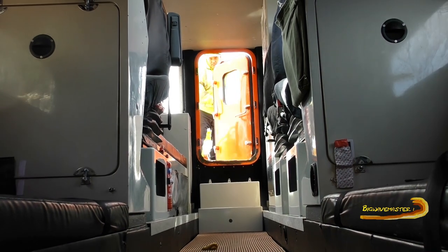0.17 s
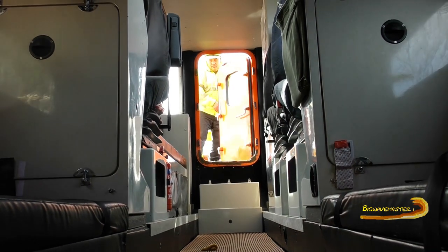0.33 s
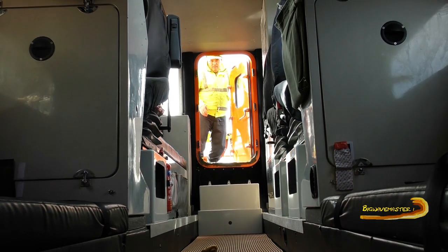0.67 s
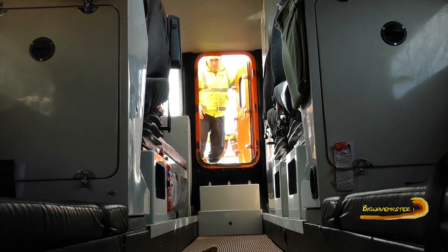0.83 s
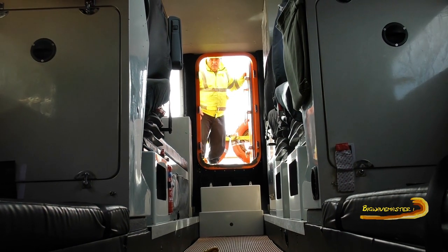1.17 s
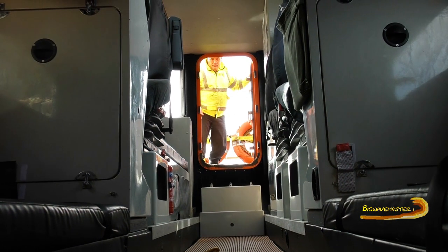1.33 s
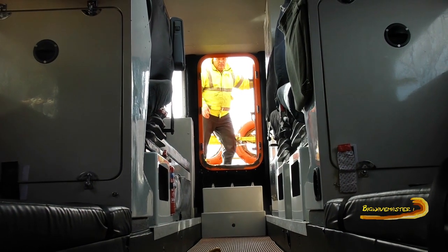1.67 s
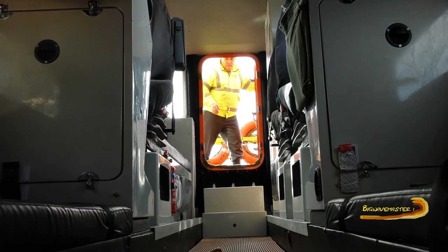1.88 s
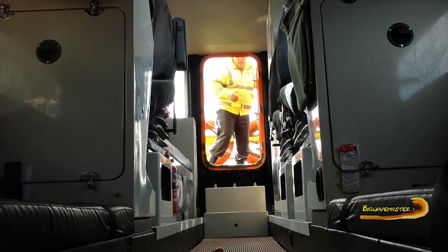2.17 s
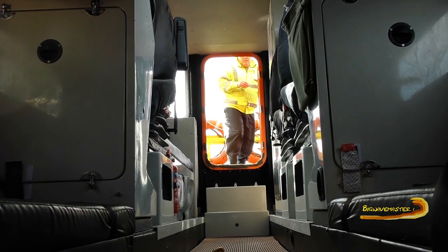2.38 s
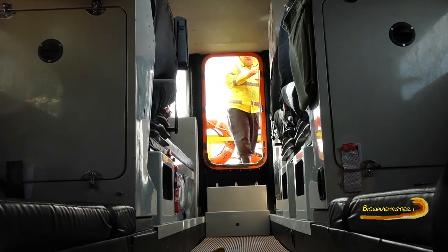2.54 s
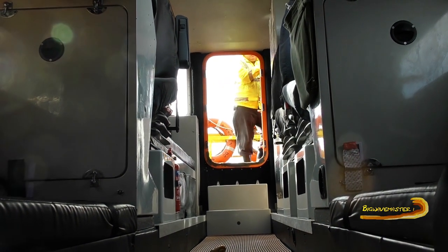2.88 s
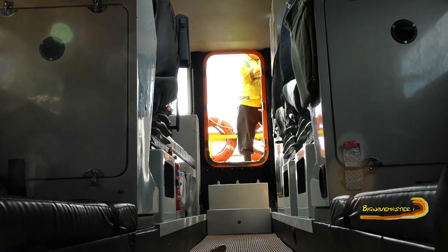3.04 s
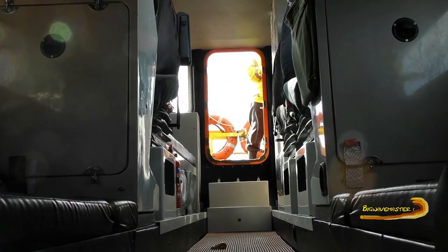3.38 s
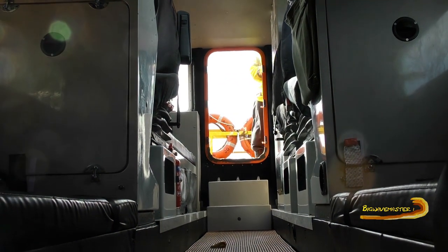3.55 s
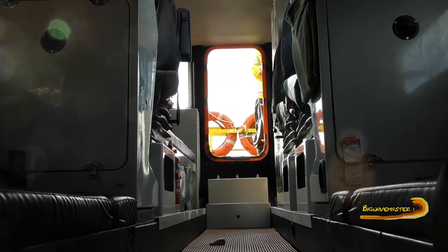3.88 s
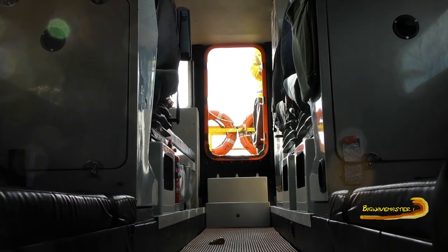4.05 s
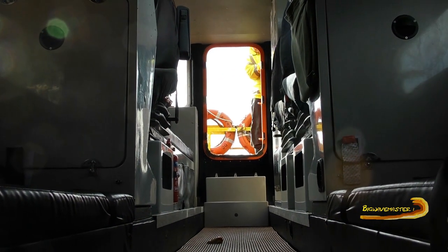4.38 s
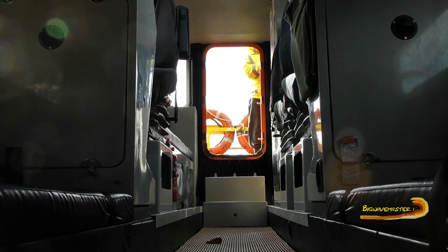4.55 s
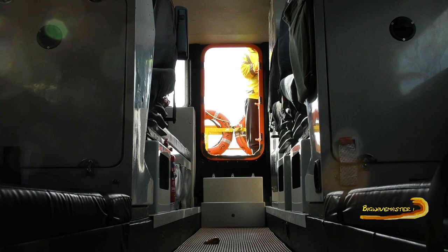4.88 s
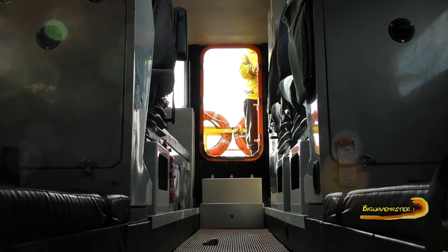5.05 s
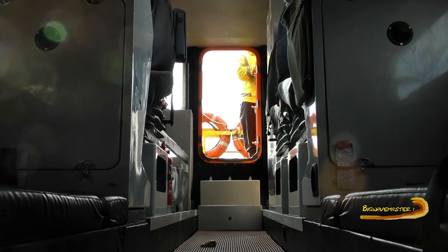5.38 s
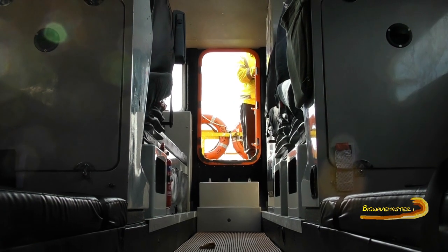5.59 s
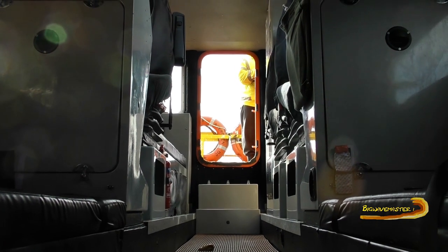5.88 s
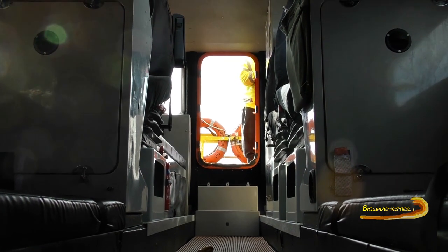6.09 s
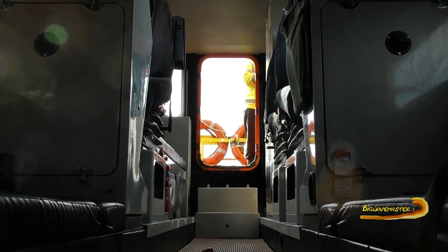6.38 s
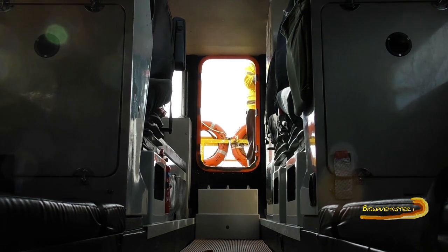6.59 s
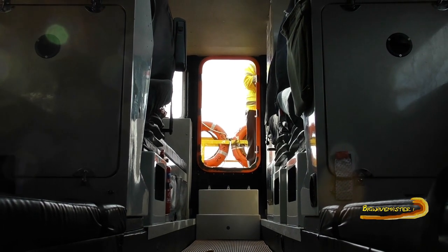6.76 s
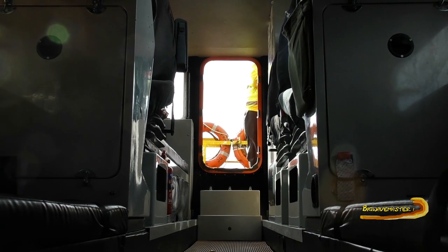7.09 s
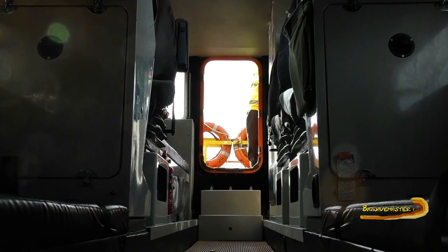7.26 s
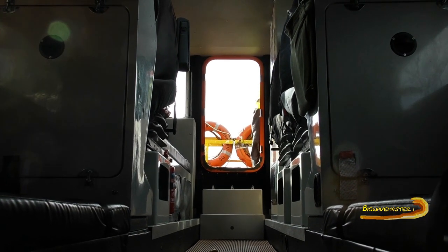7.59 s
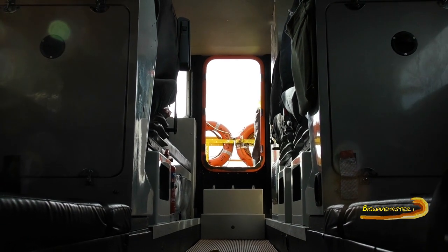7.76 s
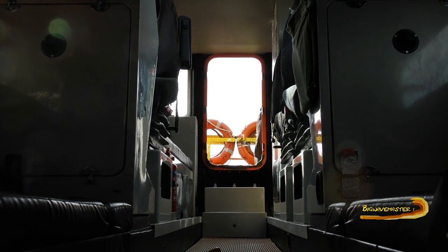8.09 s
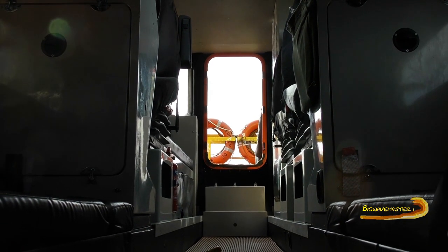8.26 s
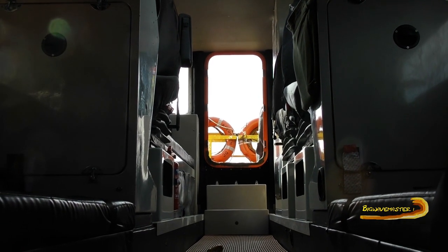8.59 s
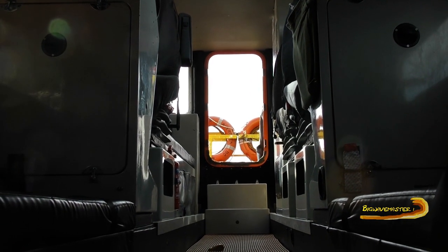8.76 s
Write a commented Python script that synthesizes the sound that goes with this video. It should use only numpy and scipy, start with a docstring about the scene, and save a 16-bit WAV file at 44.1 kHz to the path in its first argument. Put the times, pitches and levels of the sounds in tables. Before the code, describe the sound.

A diesel engine rumbles and drones through the hull of a small boat, heard from within its cabin. It grows louder after an opening bang from a metal door, then levels off. Short scuffs of cloth and soles come and go nearby, the clearest about three seconds in. Soft waves and a thin hiss of wake lie underneath, and two sharper knocks come near the end.

```python
"""A bang dies away inside the small cabin of a boat under way, door open to the deck.
After the bang all the steady sound, engine and hiss alike, swells and levels off.
The unequal firings of an eight-cylinder diesel throb through the hull, and its drone and injector
clatter ring in the panels. The wake hisses outside and a few waves wash along the hull.
Close by, cloth and soles rub in short scuffs, and light knocks set a door panel ringing."""
import sys
import numpy as np
from scipy import signal
from scipy.fft import rfft, irfft, next_fast_len
from scipy.io import wavfile
from scipy.ndimage import uniform_filter1d, minimum_filter1d

SR = 44100
rng = np.random.default_rng(int(sys.argv[2]) if len(sys.argv) > 2 else 0)


def bounce(signal):
    """Save signal as a 16-bit WAV file at the path given by the first command-line argument."""
    frames = np.transpose(np.atleast_2d(signal))
    limited = np.clip(frames, -1, 1)
    pcm = np.round(limited * 32767).astype(np.int16)
    wavfile.write(sys.argv[1], SR, pcm)


N = 393813
T = np.arange(N) / SR


def from_db(db):
    """Decibels to gain."""
    return 10 ** (np.asarray(db) / 20)


def unit_rms(x):
    """Scale to rms 1."""
    return x / np.sqrt(np.mean(x ** 2) + 1e-20)


def in_time(rows):
    """Each column of a time curve at every sample."""
    times, *columns = np.transpose(rows)
    return [np.interp(T, times, column) for column in columns]


def at_hz(points, hz):
    """Read a curve on a log-frequency axis."""
    freqs, values = np.transpose(points)
    return np.interp(np.log(hz), np.log(freqs), values)


def drift(rate_hz):
    """Smooth random wander, rms about 1."""
    hop, settle = 100, 1000
    pole = np.exp(-2 * np.pi * rate_hz * hop / SR)
    noise = rng.standard_normal(N // hop + settle + 2)
    slow = signal.lfilter([1], [1, -2 * pole, pole * pole], noise)[settle:]
    return np.interp(np.arange(N) / hop, np.arange(len(slow)), unit_rms(slow))


def add(out, sound, start_s):
    """Mix a sound in from start_s."""
    at = max(0, round(start_s * SR))
    out[:, at:at + sound.shape[1]] += sound[:, :N - at]


def stereo(mid, side, likeness):
    """Left and right from two noises; likeness 1 makes them equal."""
    return np.sqrt(1 + likeness) * mid + np.sqrt(1 - likeness) * side * [[1], [-1]]


def burst(spectrum, tilt_db, likeness, pan_db, ring_hz=1, lift_db=0, size=32768):
    """Short tilted noise with an optional resonance, diffused by the cabin walls; rms 1."""
    hz = np.maximum(np.arange(size // 2 + 1) * SR / size, 100)
    resonance_db = lift_db / (1 + (14 * (hz / ring_hz - 1)) ** 2)
    colour = from_db(at_hz(spectrum, hz) + tilt_db * np.log2(hz) + resonance_db)
    mid, side = irfft(rfft(rng.standard_normal((2, size))) * colour)
    return unit_rms(stereo(mid, side, likeness) * from_db([[pan_db / 2], [-pan_db / 2]]))


# Door panel modes. Each row: frequency in Hz, level in dB, T60 in seconds.
DOOR_MODES = [(374, -9, 0.62), (432, -5.5, 0.47), (550, -23, 0.18), (823, -13, 0.27), (950, -3, 0.21),
              (1264, 4, 0.16), (1745, -3, 0.19), (2720, -5, 0.12), (3180, -4.5, 0.13), (5510, -13, .15)]


def door_ring(t):
    """A struck door panel rings in decaying modes, phased slightly apart at the two ears."""
    ring = 0
    for hz, db, t60 in DOOR_MODES:
        phase = rng.uniform(0, 2 * np.pi) + rng.normal(0, 0.35, (2, 1))
        ring += from_db(db - 60 * t / t60) * np.sin(2 * np.pi * hz * t + phase)
    return ring


# Impact noise. Each row: frequency in Hz, relative density in dB.
KNOCK_SPECTRUM = [(150, -33), (400, 8.5), (900, 7.5), (1800, 5.5), (3000, -0.5), (6000, -10.5),
                  (10000, -21), (16000, -46)]
# Blows. Each row: start in seconds, level in dB, T60 in seconds, tilt in dB/octave, relative ring in dB.
KNOCK_EVENTS = [(0.0, -21.5, .17, 2, -1.5), (2.465, -37, 0.092, -7, -14), (2.985, -31.5, 0.19, 8, -23),
                (6.445, -41, .085, 14, -30), (7.165, -24, 0.08, -2.5, -18), (8.566, -28, .19, -4.5, -13)]


def knocks(contact_s=0.0021, thud_lag_s=0.018, thud_db=-2, thud_tilt_db=-9.5, thud_stretch=1.94):
    """Each blow clacks and rings the door; the wall answers with a duller, longer thud."""
    out = np.zeros((2, N))
    for start, db, t60, tilt_db, ring_db in KNOCK_EVENTS:
        clack = burst(KNOCK_SPECTRUM, tilt_db, likeness=0.13, pan_db=-11.5)
        thud = burst(KNOCK_SPECTRUM, tilt_db + thud_tilt_db, likeness=0.13, pan_db=-11.5)
        t = T[:clack.shape[1]]
        attack = from_db(db) * (1 - np.exp(-t / contact_s))
        clack *= from_db(-60 * t / t60)
        thud *= from_db(thud_db - 60 * t / (t60 * thud_stretch))
        add(out, attack * (clack + door_ring(t) * from_db(ring_db)), start)
        add(out, attack * thud, start + thud_lag_s)
    return out


# Ear balance. Each row: frequency in Hz, left minus right in dB.
EAR_BALANCE = [(66, -1.5), (107, -3), (132, -3.6), (180, -2.5), (207, -8.5), (260, -7.5), (320, -6.5),
               (500, -15), (770, -9.5), (1200, -10.5), (1900, -10.5), (3500, -5.5), (6400, -8.5),
               (15000, -7.5)]
# Ear phase. Each row: frequency in Hz, left lead in radians.
EAR_PHASE = [(66, -0.44), (110, -0.59), (165, -0.95), (260, -1.51), (450, -1.92), (800, -1.14),
             (1400, 0.84), (2500, 0.94), (3500, 0.6), (7000, 1.0), (10000, 0.73), (15000, 0.33)]


def two_ears(hz):
    """Complex left and right gains for sound from the engine's side; mean power 1."""
    half = from_db(at_hz(EAR_BALANCE, hz) / 2) * np.exp(.5j * at_hz(EAR_PHASE, hz))
    pair = np.array([half, 1 / half])
    return pair / np.sqrt(np.mean(abs(pair) ** 2, axis=0))


# Engine speed; each cylinder fires once a cycle. Each row: time in seconds, cycle rate in Hz.
CYCLE_RATE = [(0, 8.269), (1, 8.264), (2.3, 8.272), (3.9, 8.277), (5, 8.274), (6.4, 8.265), (8.93, 8.270)]
# Cylinder strengths in dB, in firing order; they set the phases of the orders.
FIRING_DB = [-8.4, -2.8, -1.1, -1.6, -5.7, -4.4, -2.1, -4.0]
# Orders passed by hull and cabin. Each row: multiple of the cycle rate, base level in dB.
ENGINE_ORDERS = [(3, -49), (4, -46), (5, -45), (6, -40), (7, -33.4), (8, -15.9), (9, -35), (10, -39),
                 (11, -50), (12, -43), (13, -31.6), (14, -39), (15, -25.6), (16, -23.2), (17, -30.5),
                 (18, -31.3), (19, -26.6), (20, -21.2), (21, -32.5), (22, -26.2), (23, -24), (24, -28.4),
                 (25, -27.1), (26, -42), (29, -44), (30, -34.3), (31, -38.5), (32, -38), (33, -42),
                 (34, -48), (36, -41.4), (37, -45), (38, -51), (40, -49), (41, -52), (44, -50), (48, -53),
                 (53, -47.5), (59, -50), (60, -51), (64, -51), (84, -56)]
# Hull modes. Each row: frequency in Hz, width in Hz.
HULL_RESONANCES = [(123.7, 38.6), (156.1, 3.1), (194.1, 7.6)]


def exhaust(cycles, boom_db, steady_db, waver_db=0.75, travel_turns=.1145, bending_turns=1.425):
    """Unequal firings make orders of the cycle rate; hull delay and ringing smear them into a throb."""
    firing = np.fft.fft(from_db(FIRING_DB))
    boom, steady = from_db(boom_db), from_db(steady_db)
    out = np.zeros((2, N))
    for order, db in ENGINE_ORDERS:
        hz = order * CYCLE_RATE[0][1]
        lag_turns = travel_turns * order + bending_turns * np.sqrt(order)
        mode_phase = sum(2 * np.arctan2(mode_hz - hz, width / 2) for mode_hz, width in HULL_RESONANCES)
        firing_phase = np.angle(firing[order % len(firing)])
        phase = 2 * np.pi * (order * cycles - lag_turns) + mode_phase + firing_phase
        level = np.sqrt(2) * from_db(db + waver_db * drift(4.0)) * (boom if order <= 10 else steady)
        for ear, gain in enumerate(two_ears(hz)):
            out[ear] -= abs(gain) * level * np.cos(phase + np.angle(gain))
    return out


# Panel resonances. Each row: frequency in Hz, width in Hz, lift in dB.
PANEL_MODES = [(442.3, 6.1, 9), (507, 23, -1), (521.5, 7.1, -6), (890, 31, 5.5), (988, 59, 7.5),
               (1230, 120, 3.5), (1360, 10.7, 10), (1758, 20, 7.5), (1860, 48, 2), (2125, 78, -4.5),
               (2372, 36, 6), (3150, 48, -4.5), (4550, 97, 4), (5190, 60, 4.5)]
# Likeness of the two ears. Each row: frequency in Hz, coherence from 0 to 1.
EAR_LIKENESS = [(60, 0.92), (200, 0.99), (300, 0.73), (500, 0.25), (800, 0.25), (1300, 0.44), (2000, 0.66),
                (4000, 0.24), (8000, 0.44), (15000, 0.7)]


def noise_loop(spectrum, size):
    """Seamless stereo noise, coloured by a spectrum and the panel resonances; rms 1."""
    hz = np.maximum(np.arange(size // 2 + 1) * SR / size, 1)
    mid, side = rfft(rng.standard_normal((2, size)))
    field = stereo(mid, side, at_hz(EAR_LIKENESS, hz)) * two_ears(hz)
    lift_db = sum(db / (1 + (2 * (hz - centre) / width) ** 2) for centre, width, db in PANEL_MODES)
    return unit_rms(irfft(field * from_db(at_hz(spectrum, hz) + lift_db), size))


def cabin_noise(spectrum):
    """Steady noise filling the cabin."""
    return noise_loop(spectrum, next_fast_len(N, True))[:, :N]


def engine_noise(spectrum, cycles, repeat_share):
    """Noise of which a share repeats every engine cycle, and so hums."""
    size = 2 * round(SR / CYCLE_RATE[0][1] / 2)
    one_cycle = noise_loop(spectrum, size)
    looped = np.array([np.interp(cycles, np.arange(size) / size, ear, period=1) for ear in one_cycle])
    return np.sqrt(repeat_share) * looped + np.sqrt(1 - repeat_share) * cabin_noise(spectrum)


# Hull, panel and injector noise. Each row: frequency in Hz, relative density in dB.
RUMBLE_SPECTRUM = [(15, -23), (35, 5), (62, -1.5), (88, -35), (120, 22.5), (165, 12), (205, 7), (235, 9.5),
                   (300, 6.5), (420, -36.5)]
DRONE_SPECTRUM = [(200, -8), (300, -14), (345, -1.5), (400, 4), (450, -0.5), (490, 1.5), (560, -4.5),
                  (720, -10), (1000, -46)]
CLATTER_SPECTRUM = [(450, 2.5), (750, 2), (1000, -3.5), (1500, 0), (1900, 0.5), (2500, -5), (3100, -10.5),
                    (4200, -16.5), (6000, -25), (10000, -41)]


def machinery(cycles, steady_db, rumble_db=-27, drone_db=-35.5, clatter_db=-36.5, flutter_db=0.57):
    """The hull rumbles, panels drone and injectors clatter."""
    rumble = from_db(rumble_db + steady_db) * cabin_noise(RUMBLE_SPECTRUM)
    drone = from_db(drone_db + 0.86 * steady_db) * engine_noise(DRONE_SPECTRUM, cycles, repeat_share=.18)
    clatter_gain = from_db(clatter_db + 1.06 * steady_db + flutter_db * drift(7.8))
    clatter = clatter_gain * engine_noise(CLATTER_SPECTRUM, cycles, repeat_share=.24)
    return rumble + drone + clatter


# Wake and wave noise. Each row: frequency in Hz, relative density in dB.
HISS_SPECTRUM = [(2500, 14.5), (4500, 2.5), (6500, 6.5), (8500, 4), (11000, 1), (15500, -15)]
WASH_SPECTRUM = [(330, -33), (455, -5), (497, 12.5), (560, 6.5), (610, 7.5), (680, -14.5), (820, -9),
                 (1150, -7), (2500, -75)]
# Waves meeting the hull. Each row: crest time in seconds, level in dB.
WAVE_CRESTS = [(3.0, -42), (4.35, -35), (5.65, -35.5), (8.7, -45)]


def water(steady_db, hiss_db=-52, surge_db=2.3, rise_s=0.53, drain_s=1.56):
    """The wake hisses astern; each wave washes along the hull and drains away."""
    hiss_gain = from_db(hiss_db + .9 * steady_db + surge_db * drift(8.2))
    wash_power = 0
    for crest, db in WAVE_CRESTS:
        swell = np.exp(-np.maximum((crest - T) / rise_s, (T - crest) / drain_s))
        wash_power += (from_db(db) * swell) ** 2
    return np.sqrt(wash_power) * cabin_noise(WASH_SPECTRUM) + hiss_gain * cabin_noise(HISS_SPECTRUM)


# Rubbing noise. Each row: frequency in Hz, relative density in dB.
SCUFF_SPECTRUM = [(600, -5.5), (1200, 0), (1900, 5), (2600, 5), (3800, -0.5), (5200, -3.5), (6300, -10),
                  (7500, -11.5), (11000, -11.5), (16000, -27)]
# Scuffs. Each row: peak time in seconds, level in dB, rise and fall in seconds, tilt in dB/octave,
# resonance in Hz, its lift in dB.
SCUFF_EVENTS = [(0.555, -43.5, 0.049, .06, -3, 2300, -1), (1.865, -47.5, 0.029, 0.037, 1, 4700, 3),
                (2.25, -48, 0.013, .026, 1, 6600, 14), (2.515, -40, 0.043, 0.074, 2, 3680, 6),
                (2.992, -26.5, .032, 0.054, -5, 1860, 3), (3.07, -40, 0.072, 0.1, -3, 5630, 7),
                (3.6, -36, 0.049, 0.089, 0.5, 4800, 2), (3.645, -34.5, 0.044, 0.04, 0.7, 3420, 5),
                (4.32, -47, 0.19, 0.13, 0.5, 4650, 0), (6.57, -41, 0.064, .08, -2, 2000, 7),
                (8.86, -39, 0.048, .045, -4.5, 4650, -2)]


def scuffs(grain_db=2, lead_s=.35, trail_db=-12, trail_s=0.16):
    """Stiff cloth and soles rub: grainy noise that swells, fades and trails off."""
    out = np.zeros((2, N))
    for peak, db, rise, fall, tilt_db, ring_hz, lift_db in SCUFF_EVENTS:
        rub = burst(SCUFF_SPECTRUM, tilt_db, likeness=0.27, pan_db=-6.5, ring_hz=ring_hz, lift_db=lift_db)
        t = T[:rub.shape[1]] - lead_s
        swell = np.exp(-(t / np.where(t < 0, rise, fall)) ** 2)
        trail = from_db(trail_db) * np.exp(-np.abs(t) / np.where(t < 0, rise, trail_s))
        grainy_gain = from_db(db + grain_db * drift(120)[:len(t)])
        add(out, rub * np.maximum(swell, trail) * grainy_gain, peak - lead_s)
    return out


# Level of the steady sound. Each row: time in seconds, gain of the deep boom in dB, of the rest in dB.
STEADY_LEVEL = [(0.05, -10.9, -9.5), (0.55, -6, -6), (1.6, -5, -5.5), (2.4, -1.6, -2), (4.35, -0.0, 1.4),
                (4.55, -2.6, 0.15), (5.8, 0.2, 0.5), (7.5, 1, 0.92), (8.93, 1, 0.6)]


def scene():
    """The steady sound swells, dips briefly and levels off; scuffs and knocks fall on top."""
    cycles = np.cumsum(in_time(CYCLE_RATE)[0]) / SR
    boom_db, steady_db = in_time(STEADY_LEVEL)
    engine = exhaust(cycles, boom_db, steady_db) + machinery(cycles, steady_db)
    return engine + water(steady_db) + scuffs() + knocks()


def record(dry, ceiling=.98, cutoff_hz=15650):
    """A limiter ducks both channels around peaks over the ceiling; a steep low-pass cuts the top."""
    window = SR // 100
    max_gain = np.minimum(1, ceiling / (np.abs(dry).max(axis=0) + 1e-9))
    gain = uniform_filter1d(minimum_filter1d(max_gain, size=window), size=window)
    lowpass = signal.ellip(12, .1, 80, cutoff_hz, fs=SR, output="sos")
    return signal.sosfilt(lowpass, dry * gain)


dry = scene()
out = record(dry)
bounce(out)
```